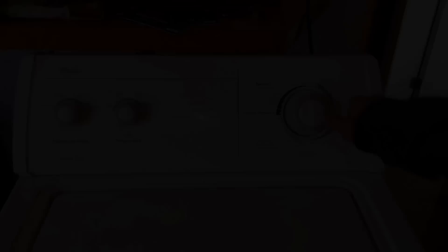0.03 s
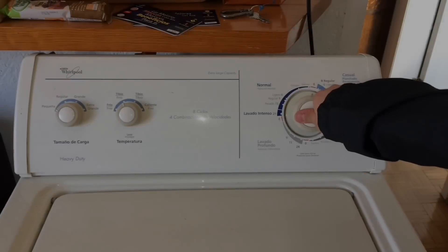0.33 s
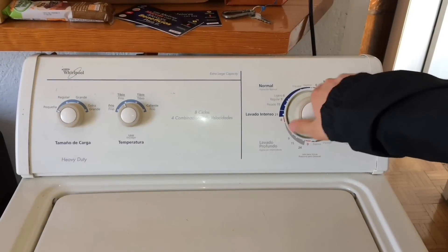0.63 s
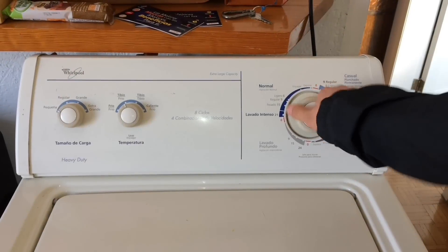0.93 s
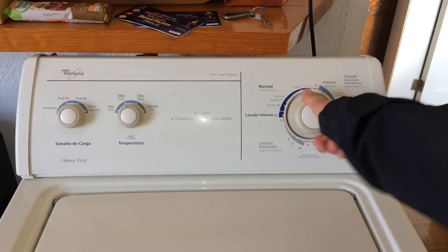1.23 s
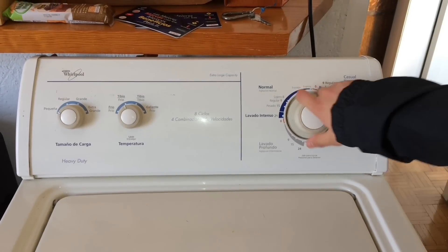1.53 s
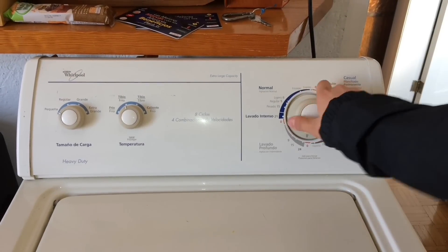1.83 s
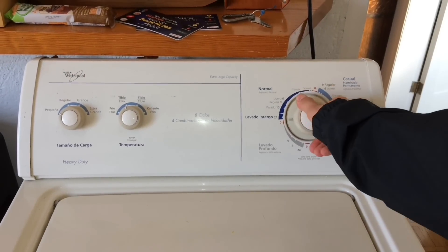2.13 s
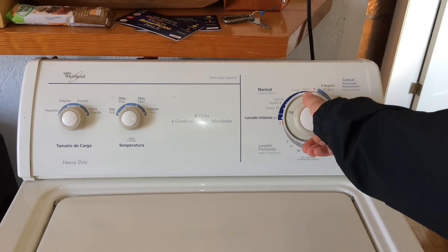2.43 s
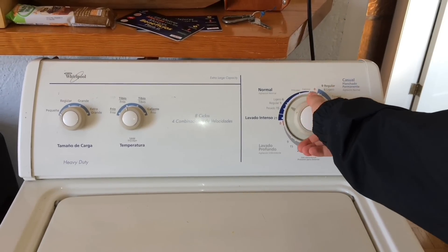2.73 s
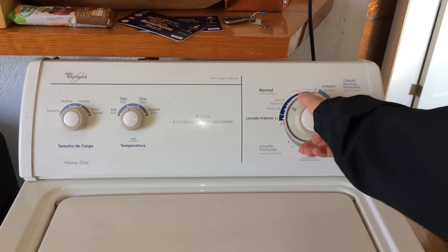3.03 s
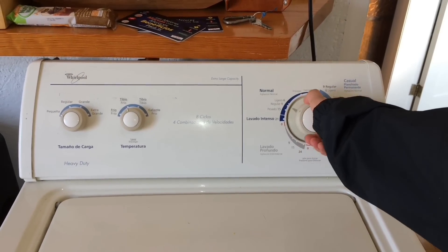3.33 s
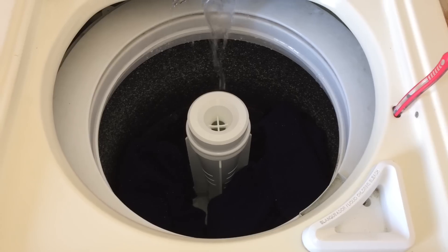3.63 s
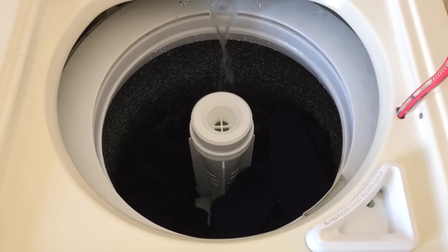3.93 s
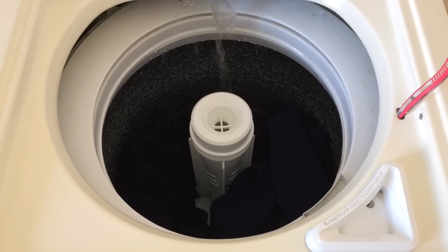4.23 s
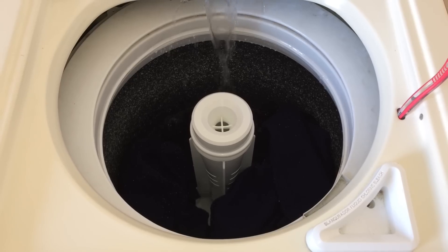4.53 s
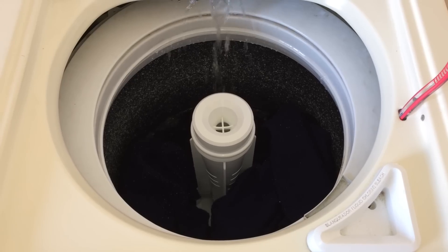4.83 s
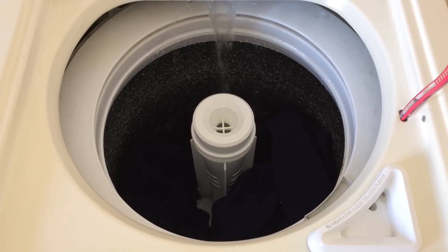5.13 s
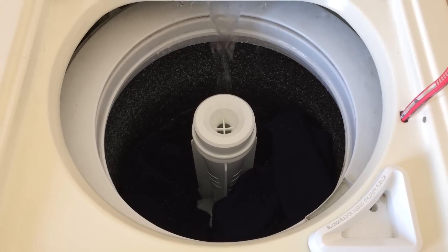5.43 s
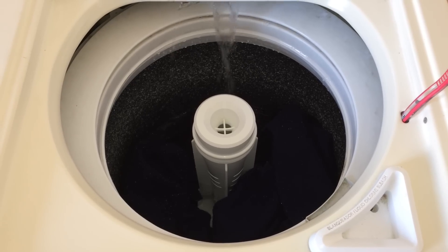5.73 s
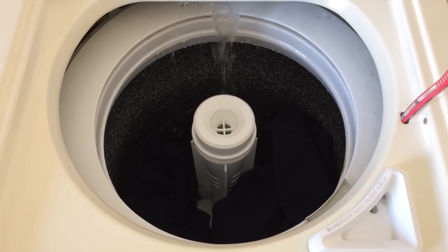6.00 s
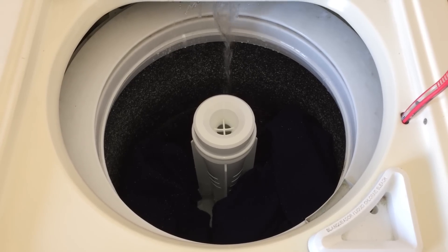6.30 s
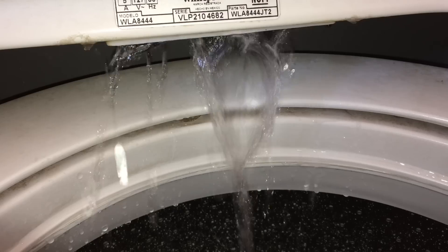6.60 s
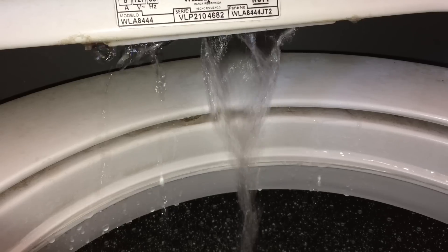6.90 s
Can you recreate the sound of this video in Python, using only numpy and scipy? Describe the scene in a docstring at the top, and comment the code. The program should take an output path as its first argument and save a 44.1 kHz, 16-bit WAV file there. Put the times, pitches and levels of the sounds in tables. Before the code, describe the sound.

In a quiet laundry room, a hand winds the timer dial of a top-loading washing machine in quick ratcheting bursts, slowing to single clicks. The knob is pulled out with a thunk that booms briefly through the steel cabinet. Then, heard from above the open tub, a stream of water spatters into a shallow pool over a low valve hum. The last moment is closer to the inlet and louder.

```python
"""Starting a top-loading washer

A hand winds the timer dial, which clicks over its ratchet teeth, then pulls the knob out with a thunk.
Next, over the open tub, the inlet valve hums while a stream of water spatters into the shallow pool.
Each large drop is a splash plus the ping of a trapped bubble, and the drum echoes the drops.
The last moment is heard close to the inlet, where hum and spatter are louder."""
import sys
import numpy as np
from scipy import signal
from scipy.fft import rfft, irfft
from scipy.io import wavfile

SR = 44100
rng = np.random.default_rng(int(sys.argv[2]) if len(sys.argv) > 2 else 0)


def transcribe(u):
    """Save the signal u as a 16-bit wav file named by the first command-line argument.

    u: samples, shape (n,) or (channels, n), limited to [-1, 1]; the rate is SR.
    q: integer samples, one column per channel.
    """
    v = np.clip(np.atleast_2d(u).T, -1, 1)
    q = np.round(v * 32767).astype(np.int16)
    wavfile.write(sys.argv[1], SR, q)


N = 306936
T = np.arange(N) / SR
PULL_S, TUB_S, INLET_S = 3.3475, 3.517, 6.483  # when the thunk, the tub and the inlet are first heard
SPRAY_LEAD_S = .006  # time for spray to land ahead of a drop's slap
TOP_HZ = 15550  # upper edge of the treble

# Twists of the dial. Each row: start in seconds, number of teeth, relative level of a tooth in dB.
DIAL_TWISTS = [(0.942, 16, -23), (1.119, 10, -22.5), (1.7747, 4, -19), (1.867, 4, -20), (1.951, 7, -22.5),
               (2.04, 8, -23.5), (2.2357, 4, -22.5), (2.371, 1, -27), (2.429, 1, -33), (2.4404, 1, -20),
               (2.5619, 1, -20.5), (2.608, 1, -22), (2.808, 1, -23.5)]
# Tone of a tooth snapping. Each row: frequency in Hz, relative level in dB.
TOOTH_TONE = [(90, -35), (190, -7.5), (270, -0.5), (480, -3.5), (1000, -5), (1250, -2.5), (2500, -2.5),
              (3300, -2), (4400, 1), (5600, -3), (8000, -4.5), (11000, -8.5), (15500, -5.5)]
# Resonances of the sheet-metal console. Each row: frequency in Hz, width in Hz, boost or cut in dB.
CONSOLE_PEAKS = [(252, 16, 7), (300, 49, -6), (374, 67, 12.5), (673, 24, 10.5), (725, 69, -6.5),
                 (813, 136, 7.5), (999, 94, 12), (2680, 110, -3), (3809, 34, 8.5), (4060, 76, 5),
                 (4460, 110, 4), (5350, 100, 4.5)]
# After-ring of console and room. Each row: frequency in Hz, seconds to fade by 60 dB (called t60).
CONSOLE_RING = [(150, 0.84), (400, 0.78), (1000, 0.36), (2800, 0.37), (4500, 0.37), (8000, 0.33),
                (15000, 0.18)]
# Long tones of the timer's steel frame. Each row: pitch in Hz, relative level in dB.
FRAME_TONES = [(840, -4), (2300, -4), (2805, 1), (3770, -2), (3945, -5), (4408, -3), (4571, -2), (5110, -6),
               (5782, 2), (7990, -4.5), (9400, -1.5)]
# Low tones of the console panel. Each row: pitch in Hz, relative level in dB, t60 in seconds.
PANEL_TONES = [(256.8, 1.5, 0.15), (319, -6.5, .15), (389.2, -3.5, 0.28)]
# Fingers on the knob, then the pull that closes the switch.
# Each row: start in seconds, tick level in dB, treble tilt in dB per octave.
KNOB_TICKS = [(0.466, -46.5, -4), (.666, -54, 2), (0.8374, -51.5, -2), (1.68, -52, -3), (3.056, -58, 7),
              (3.211, -43, -5), (3.225, -40.5, 1.5), (3.3332, -30.5, 4.5), (3.3454, -18.5, 6),
              (3.35, -19.5, -1)]
# Tone of those ticks. Each row: frequency in Hz, relative level in dB.
TICK_TONE = [(100, -14), (500, 7), (700, -4), (1000, 4.5), (1600, 0.5), (2200, -1), (2900, -2.5),
             (4500, -10), (6500, -10.5), (9000, -17.5), (12000, -18), (15500, -25)]
# Tones of the hollow plastic knob. Each row: pitch in Hz, relative level in dB, t60 in seconds.
KNOB_TONES = [(946, -2, 0.029), (1900, -1, 0.026), (2130, 8.5, 0.013), (2490, -3.5, 0.031)]
# Cabinet tones shaken by the pull. Each row: pitch in Hz, level in dB, t60 in seconds.
CABINET_TONES = [(62, -31.5, 0.23), (132, -36, 0.27), (186, -25, 0.29), (198.2, -10, 0.39),
                 (222.3, -25, 0.56), (277.5, -22, 0.337), (359, -25.5, 0.39), (395, -25, 0.22),
                 (894, -27, 0.15), (1210, -29, 0.21)]
# The loudest drops. Each row: time in seconds, splash level in dB, bubble pitch in Hz, bubble level in dB.
LOUD_DROPS = [(3.58, -31, 2560, -36), (3.6191, -33, 4060, -30.5), (3.7842, -27, 7600, -37),
              (4.0187, -31.5, 9800, -31), (4.0674, -25.5, 9500, -28), (4.1117, -32, 5870, -36.5),
              (4.163, -33, 6430, -35), (4.3944, -35, 3250, -29), (4.5253, -31.5, 3780, -29),
              (4.558, -23.5, 3560, -27.5), (4.582, -42, 5240, -32), (4.7487, -40, 3780, -31),
              (4.758, -40, 12800, -28.5), (4.7967, -32.5, 4300, -34), (4.907, -32.5, 3100, -36.5),
              (4.989, -26, 10600, -31), (5.1998, -39, 6500, -34.5), (5.278, -32.5, 12000, -31),
              (5.3844, -30.5, 4200, -40), (5.5014, -36, 8500, -36.5), (5.6319, -40, 5120, -29),
              (5.7442, -34, 3900, -35), (5.9154, -29, 4100, -39), (6.078, -40, 10900, -36),
              (6.1062, -35, 4030, -38), (6.208, -46, 12800, -29), (6.2884, -28, 4200, -34.5),
              (6.5296, -27, 1510, -35), (6.567, -26.5, 4500, -30.5), (6.6116, -30, 3950, -30.5),
              (6.686, -28.5, 4930, -30.5), (6.72, -27, 2780, -28), (6.8136, -30.5, 4500, -31),
              (6.8563, -25, 4100, -25)]
# Tone of a splash. Each row: frequency in Hz, relative level in dB.
SPLASH_TONE = [(600, -16.5), (1500, -4.5), (3500, 4), (5000, 4), (7500, 2), (10000, 5.5), (15000, 4.5)]
# Strength of the spatter. Each row: time in seconds, relative level in dB.
SPATTER_LEVELS = [(3.53, -41.5), (3.8, -42), (4.8, -40), (5.1, -45), (5.4, -41), (6.46, -41), (6.53, -36),
                  (6.95, -35.5)]
# The stream churning the pool. Each row: frequency in Hz, relative level in dB.
CHURN_TONE = [(25, -25), (55, 0.5), (90, -2), (160, 4.5), (225, 2), (295, -8.5), (370, -5.5), (560, -9.5),
              (720, -13.5), (900, -10.5), (1100, -14), (1400, -17), (4000, -29), (15000, -21)]
# The stream's rush beside the inlet. Each row: frequency in Hz, relative level in dB.
INLET_TONE = [(25, -14), (60, 8), (100, 12), (150, 9.5), (190, -2.5), (235, 2.5), (300, -6), (560, -5.5),
              (740, -6.5), (1050, -3), (1700, -9), (4000, -24), (15000, -18)]
# Resonances of the air in the drum. Each row: frequency in Hz, width in Hz, boost in dB.
DRUM_PEAKS = [(230, 17, 4.5), (362, 21, 4), (599, 15, 9.5), (887, 97, 4.5), (1090, 33, 11)]
# After-ring of the drum. Each row: frequency in Hz, t60 in seconds.
DRUM_RING = [(300, 0.46), (1100, 0.35), (4000, 0.19), (15000, 0.013)]
# Valve hum. Each row: multiple of the mains frequency, level over the tub in dB, level at the inlet in dB.
HUM_TONES = [(2, -44.5, -32.5), (4, -58.5, -56.5), (6, -60.5, -49.5), (18, -62, -52.5)]
# Tone of the room's murmur. Each row: frequency in Hz, relative level in dB.
ROOM_TONE = [(25, -42), (45, -13), (90, -14.5), (125, -8), (185, -3), (230, -4.5), (280, -21), (380, -16),
             (500, -24.5), (1000, -25.5), (2500, -37.5), (5000, -45.5), (15000, -53.5)]
# Strength of that murmur. Each row: time in seconds, level in dB.
ROOM_LEVELS = [(.09, -87), (.16, -64.5), (.3, -57), (.45, -50.5), (.85, -45.5), (1.5, -42), (2.7, -43.5),
               (3.3, -44.5)]


def dial(tooth_gap_s=.0102, uneven_s=.0017, shared_part=.52, steel_db=-18, steel_t60=.36):
    """A catch snaps over one tooth after another; the steel frame sings on and the panel knocks."""
    def tooth():
        return snap(rise_s=.0022, crack_t60=.044, rattle_db=0, rattle_t60=.12)
    shared = tooth()  # all teeth have part of their sound in common
    snaps, knocks = np.zeros((2, N))
    t = np.arange(len(shared)) / SR
    for start, teeth, db in DIAL_TWISTS:
        knock_db = -27 + 2.8 * (db + 18)  # the knock grows quickly as the twist gets harder
        for k in range(teeth):
            late, extra_db = (k > 0) * rng.standard_normal(2)
            at = start + k * tooth_gap_s + uneven_s * late
            tones = sum(amp(level) * sine(hz, t) for hz, level in FRAME_TONES)
            steel = amp(steel_db) * unit_blow(tones * fall(t, steel_t60))
            click = np.sqrt(shared_part) * shared + np.sqrt(1 - shared_part) * tooth()
            add(snaps, at, amp(db + 1.5 + extra_db) * (click + steel))
            panel = sum(amp(level) * sine(hz, t) * fall(t, t60) for hz, level, t60 in PANEL_TONES)
            add(knocks, at, amp(knock_db) * unit_blow(panel * rise(t, .003)))
    return through(snaps, tone_filter(TOOTH_TONE, CONSOLE_PEAKS)) + knocks


def snap(rise_s, crack_t60, rattle_db, rattle_t60, ring_db=-6):
    """A blow inside the console: a spiky crack, the rattle of the housing, then the after-ring."""
    ring = dense_ring(CONSOLE_RING)
    t = np.arange(len(ring)) / SR
    crack_noise, rattle_noise, spikes = rng.standard_normal((3, len(t)))
    crack = unit_blow(crack_noise * spikes * fall(t, crack_t60))
    rattle = amp(rattle_db) * unit_blow(rattle_noise * fall(t, rattle_t60))
    return unit_blow((crack + rattle + amp(ring_db) * ring) * rise(t, rise_s))


def knob(knock_db=-3):
    """Ticks on the shaft, each with a short hollow knock of the knob."""
    out = np.zeros(N)
    for start, db, tilt_db in KNOB_TICKS:
        tick = snap(rise_s=.00029, crack_t60=.056, rattle_db=-.5, rattle_t60=.18)
        tick = unit_blow(through(tick, tone_filter(TICK_TONE, tilt_db=tilt_db)))
        t = np.arange(len(tick)) / SR
        knock = unit_blow(struck(KNOB_TONES, t, rise_s=.0026))
        add(out, start, amp(db) * (tick + amp(knock_db) * knock))
    return out


def cabinet():
    """The knob hits its stop and the steel cabinet booms."""
    return struck(CABINET_TONES, np.maximum(T - PULL_S, 0), rise_s=.0059)


def drops(rows, max_cycles):
    """Each drop is a splash plus the ping of its bubble; some land clean, others burst into spray."""
    pings, splashes = np.zeros((2, N))
    for at, splash_db, hz, ping_db in rows:
        add(pings, at, amp(ping_db) * bubble(hz, max_cycles * rng.uniform(.54, 1)))
        burst = splash(1.423 * hz, spray_db=rng.uniform(-6, 3), scatter_s=.0016, octaves=.728)
        add(splashes, at - SPRAY_LEAD_S, amp(splash_db) * burst)
    return pings + through(splashes, tone_filter(SPLASH_TONE))


def bubble(hz, cycles, glide=.057, size=1500):
    """A trapped bubble rings for a few cycles and rises a little in pitch."""
    turns = hz * np.arange(size) / SR
    pitch = hz * (1 + glide * np.tanh(turns / cycles))
    phase = 2 * np.pi * np.cumsum(pitch) / SR
    return unit_blow(np.sin(phase) * np.exp(-turns / cycles) * rise(turns, .5))


def splash(hz, spray_db, scatter_s, octaves, cycles=3, count=14, size=1500):
    """A drop breaks up: a slap amid a clump of tiny ticks pitched around hz, a few landing early."""
    t = np.arange(size) / SR - SPRAY_LEAD_S
    slap = rng.standard_normal(size) * fall(abs(t), t60=.0045) * (t > 0)
    at = scatter_s * (rng.exponential(1, (count, 1)) - rng.exponential(.46, (count, 1)))
    pitch = hz * 2 ** (octaves * rng.standard_normal((count, 1)))
    pitch = np.where(pitch < TOP_HZ, pitch, TOP_HZ ** 2 / pitch)  # keeps the finest ticks audible
    turns = pitch * np.maximum(t - at, 0)
    strength = rng.exponential(1, (count, 1)) * np.sqrt(pitch)
    ticks = strength * np.sin(2 * np.pi * turns) * np.exp(-turns / cycles)
    return unit_blow(unit_blow(slap) + amp(spray_db) * unit_blow(ticks.sum(0)))


def stray_drop_rows(per_s=17, low_hz=3360, high_hz=11440, spread_db=5, count=100):
    """Middling drops break off the stream at loose intervals; gives rows like those of LOUD_DROPS."""
    splash_db, ping_db = spread_db * rng.uniform(-1.17, 1, (count, 2)).T
    times = TUB_S + (np.arange(count) + 1 + .37 * rng.standard_normal(count)) / per_s
    hz = low_hz * (high_hz / low_hz) ** rng.random(count)
    db = curve(SPATTER_LEVELS, times)
    rows = np.column_stack([times, db + 3 + splash_db, hz, db + 3.5 + ping_db])
    return rows[times < T[-1]]


def spatter(close, mist_db=-2, pings_db=-11, gurgle_db=-17):
    """A mist of small drops, pinging bubbles and deeper gurgles; the mist sounds fuller at the inlet."""
    droplets = [splash(hz, spray_db=-3, scatter_s=.002, octaves=.43)
                for hz in np.geomspace(3800, 15000, 60)]
    spray = patter(droplets, per_s=420, spread_db=12, surge=.65)
    above = through(spray, tone_filter(SPLASH_TONE))
    beside = through(spray, tone_filter(SPLASH_TONE, tilt_db=-2))
    mist = (1 - close) * above + close * beside
    small_bubbles = [bubble(hz, cycles=5) for hz in np.geomspace(2400, 13500, 40)]
    pings = patter(small_bubbles, per_s=500, spread_db=9, surge=.68)
    deep_bubbles = [bubble(hz, cycles=7) for hz in np.geomspace(950, 2800, 40)]
    gurgle = patter(deep_bubbles, per_s=170, spread_db=10, surge=.4)
    mix = amp(mist_db) * mist + amp(pings_db) * pings + amp(gurgle_db) * gurgle
    return amp(curve(SPATTER_LEVELS, T)) * mix


def patter(sounds, per_s, spread_db, surge):
    """Scatters tiny sounds in clumps, at a rate that swings around per_s; most are soft, a few louder."""
    out = np.zeros(N)
    chance = per_s / SR * np.exp(surge * wander(25))
    hits = np.flatnonzero(rng.random(N) < chance)
    sizes = amp(spread_db * np.minimum(rng.exponential(1, N), 2.2))
    kinds = rng.integers(0, len(sounds), N)
    for i in hits:
        add(out, i / SR, sizes[i] * sounds[kinds[i]])
    return unit_rms(out)


def tub_echo(water, wall_db=-8, wall_t60=.0096, ring_db=-15, spots=4):
    """The drum wall throws the sound back, then rings briefly; the echo changes as the stream sways."""
    sway = np.array([wander(14.4) for _ in range(spots)])
    out = water
    for weight in sway / np.linalg.norm(sway, axis=0):
        ring = dense_ring(DRUM_RING)
        t = np.arange(len(ring)) / SR
        bounces = rng.standard_normal(len(t)) * (rng.random(len(t)) < .03)
        walls = bounces * fall(t, wall_t60) * (t > .0012)
        echo = amp(wall_db) * walls / np.linalg.norm(walls) + amp(ring_db) * ring / np.linalg.norm(ring)
        out = out + through(weight * water, echo)
    return out


def churn(close, tub_db=-42, inlet_db=-38, swell_db=2.38):
    """The steady rush of the stream; the hollow drum colours it when heard from above."""
    rush = rng.standard_normal(N)
    above = amp(tub_db) * through(rush, tone_filter(CHURN_TONE, DRUM_PEAKS))
    beside = amp(inlet_db) * through(rush, tone_filter(INLET_TONE))
    return ((1 - close) * above + close * beside) * amp(swell_db * wander(31))


def valve(close, mains_hz=60, waver_db=1.1, drift_radians=.11):
    """The valve's electromagnet hums on even multiples of the mains frequency, wavering a little."""
    hum = np.zeros(N)
    for multiple, far_db, near_db in HUM_TONES:
        phase = 2 * np.pi * (multiple * mains_hz * T + rng.random()) + drift_radians * wander(14)
        hum += amp(far_db + (near_db - far_db) * close) * np.sqrt(2) * np.sin(phase)
    return hum * amp(waver_db * wander(7.7))


def room_murmur():
    """The low murmur of the laundry room fades in."""
    murmur = through(rng.standard_normal(N), tone_filter(ROOM_TONE))
    return amp(curve(ROOM_LEVELS, T)) * unit_rms(murmur)


def struck(tones, t, rise_s):
    """A struck object: its tones swell together, then each fades at its own speed."""
    return rise(t, rise_s) * sum(amp(db) * np.sin(2 * np.pi * hz * t) * fall(t, t60)
                                 for hz, db, t60 in tones)


def dense_ring(t60s, size=22050):
    """Countless close tones, made from noise in which each band fades at its own speed."""
    hz, t, bands = signal.stft(rng.standard_normal(size), SR, nperseg=256)
    _, ring = signal.istft(bands * fall(t, spectrum(t60s, hz)[:, None]), SR)
    return unit_blow(ring[:size])


def tone_filter(points, peaks=(), tilt_db=0, size=8192):
    """Builds a filter of energy 1 from a broad tone shape, resonances and a treble tilt."""
    hz = np.fft.rfftfreq(size, 1 / SR)
    db = spectrum(points, hz) + tilt_db * np.log2(1 + hz / 1000)
    for centre, width, lift_db in peaks:
        db += lift_db / (1 + (2 * (hz - centre) / width) ** 2)
    log_gain = np.log(amp(np.concatenate([db, db[-2:0:-1]])))
    response = np.exp(np.conj(signal.hilbert(log_gain)))  # rings after a hit, never before it
    taps = np.fft.ifft(response).real[:size // 2]
    return taps / np.linalg.norm(taps)


def wander(per_s):
    """A smooth random wobble of typical size 1; a higher per_s makes it quicker."""
    hz = np.fft.rfftfreq(N, 1 / SR)
    return unit_rms(irfft(rfft(rng.standard_normal(N)) * np.exp(-(hz / per_s) ** 2), N))


def spectrum(points, hz):
    """Reads between rows of frequency and value, giving each octave about equal room."""
    known_hz, value = np.transpose(points)
    return np.interp(np.log(hz + 1), np.log(known_hz + 1), value)


def unit_blow(x):
    """Scales a short sound to the energy of 10 ms at 0 dB."""
    return x / np.sqrt(np.sum(x ** 2) / (.01 * SR) + 1e-20)


def unit_rms(x):
    return x / np.sqrt(np.mean(x ** 2) + 1e-20)


def amp(db):
    return 10 ** (np.asarray(db) / 20)


def sine(hz, t):
    """A pure tone that starts at a random point in its cycle."""
    return np.sin(2 * np.pi * (hz * t + rng.random()))


def curve(rows, times):
    return np.interp(times, *np.transpose(rows))


def rise(t, rise_time):
    return 1 - np.exp(-t / rise_time)


def fall(t, t60):
    return np.exp(-np.log(1000) * t / t60)


def through(x, taps):
    return signal.oaconvolve(x, taps)[:len(x)]


def add(mix, start_s, sound):
    part = mix[max(round(start_s * SR), 0):][:len(sound)]
    part += sound[:len(part)]


def scene(fade_out_s=.025, fade_in_s=.045, dip_s=.041):
    """Three listening places (dial, tub, inlet), joined by short fades through silence."""
    close = 1. * (T > INLET_S)  # 0 over the tub, 1 beside the inlet
    controls = dial() + knob() + cabinet() + room_murmur()
    water = drops(LOUD_DROPS, max_cycles=4.6) + drops(stray_drop_rows(), max_cycles=2.6) + spatter(close)
    filling = tub_echo(water) + churn(close) + valve(close)
    fade_out = np.clip((TUB_S - T) / fade_out_s, 0, 1) ** 2
    fade_in = np.clip((T - TUB_S) / fade_in_s, 0, 1)
    dip = np.clip(abs(T - INLET_S) / dip_s, 0, 1)
    return (fade_out * controls + fade_in * dip * filling)[None]


def record(dry):
    """Cuts away the treble above TOP_HZ."""
    low_pass = signal.firwin(301, TOP_HZ, window=("kaiser", 8), fs=SR)
    return signal.oaconvolve(dry, low_pass[None], "same")


dry = scene()
out = record(dry)
transcribe(out)
```